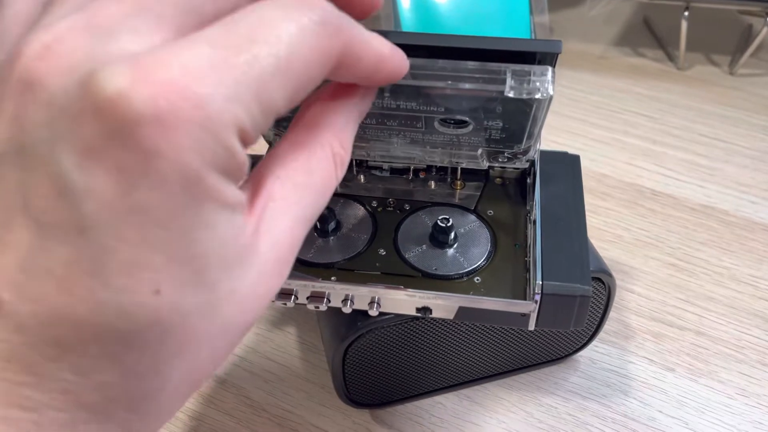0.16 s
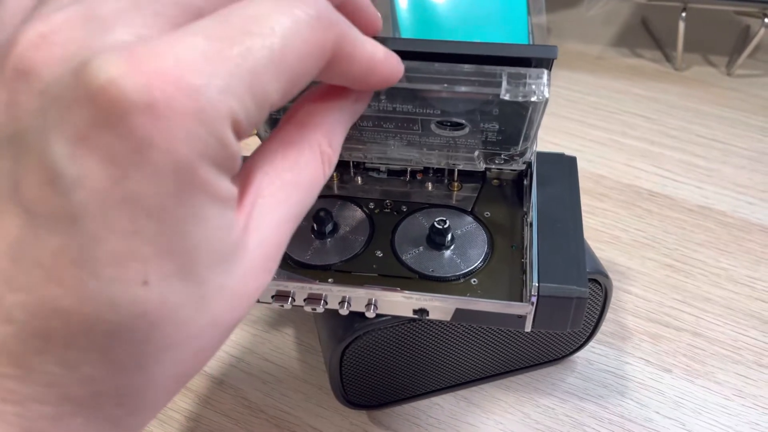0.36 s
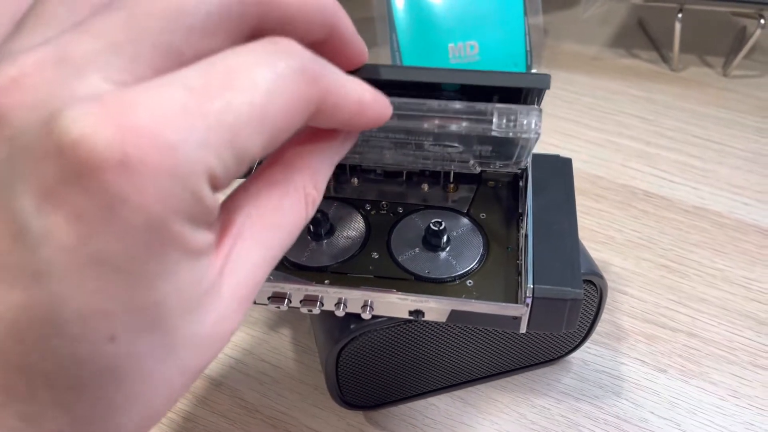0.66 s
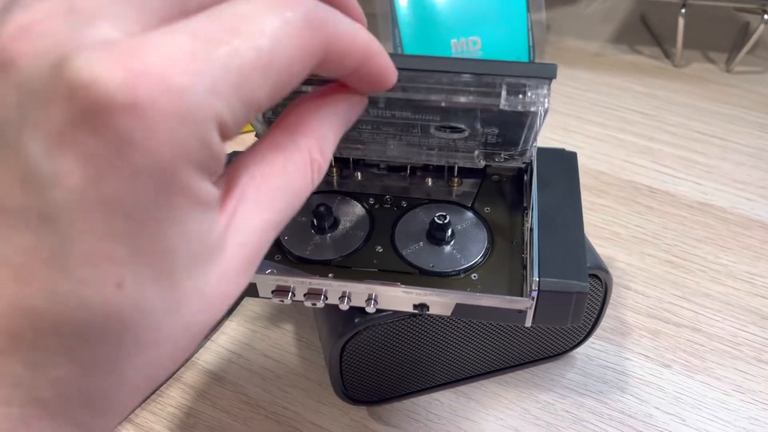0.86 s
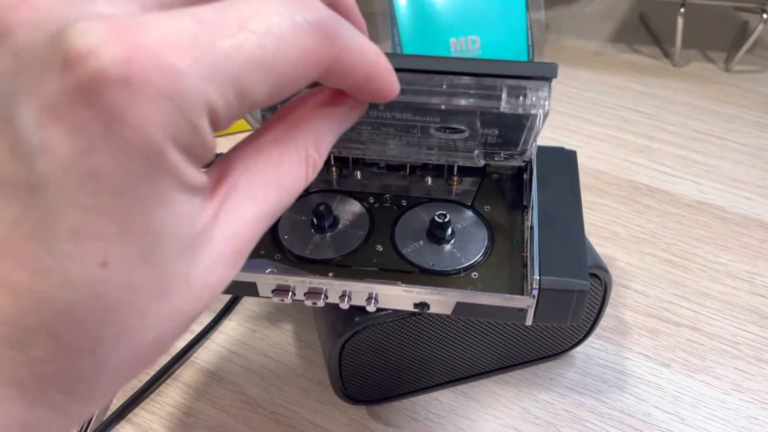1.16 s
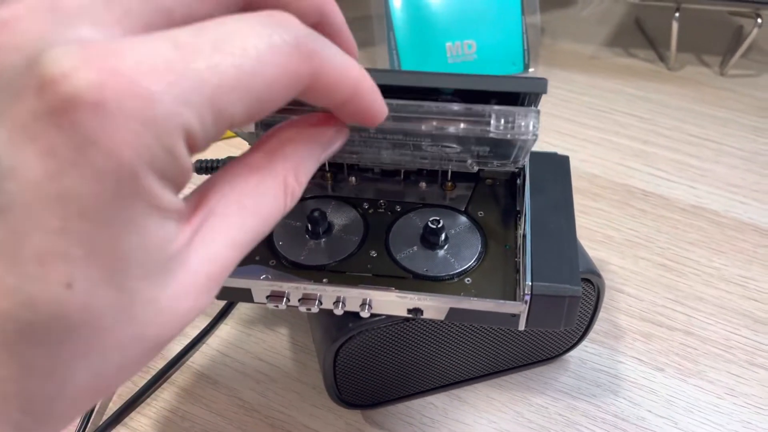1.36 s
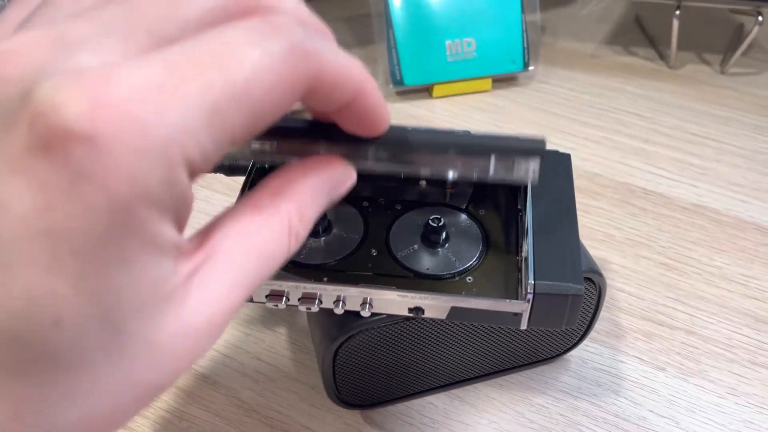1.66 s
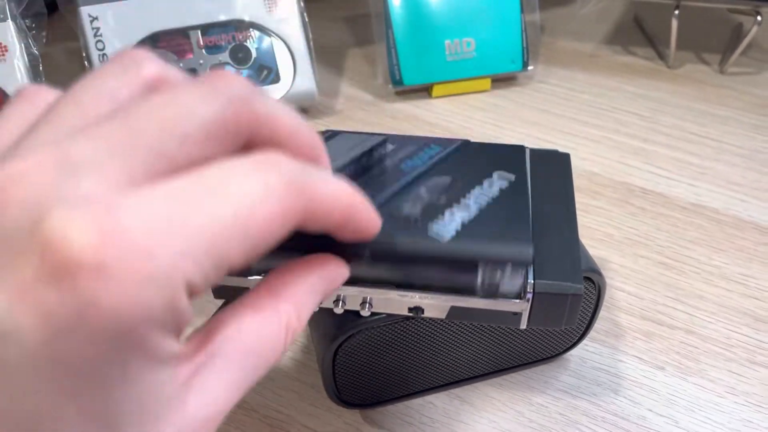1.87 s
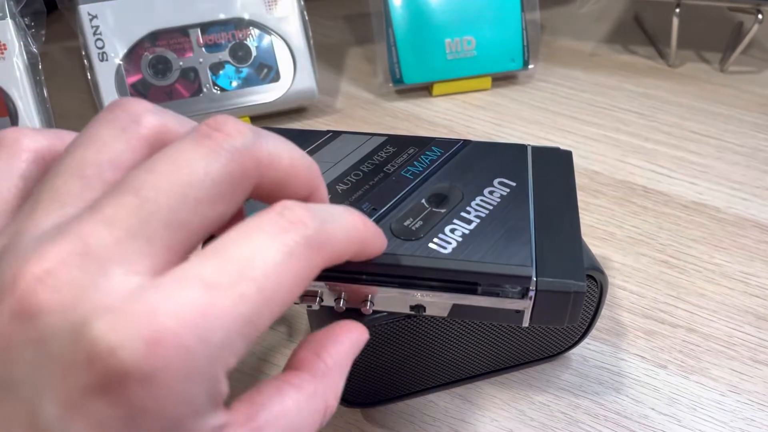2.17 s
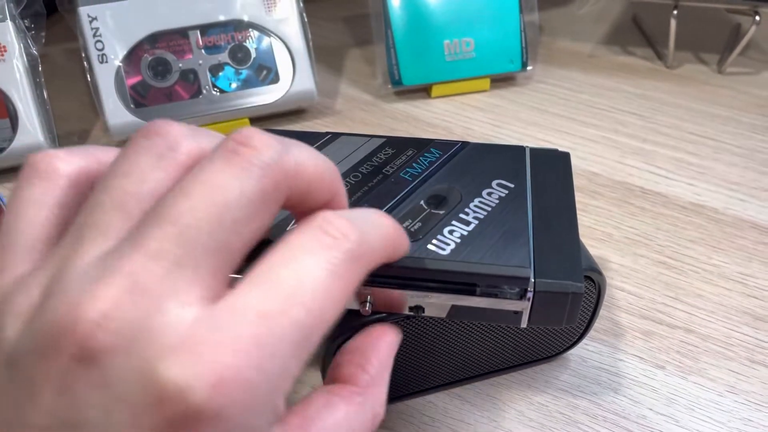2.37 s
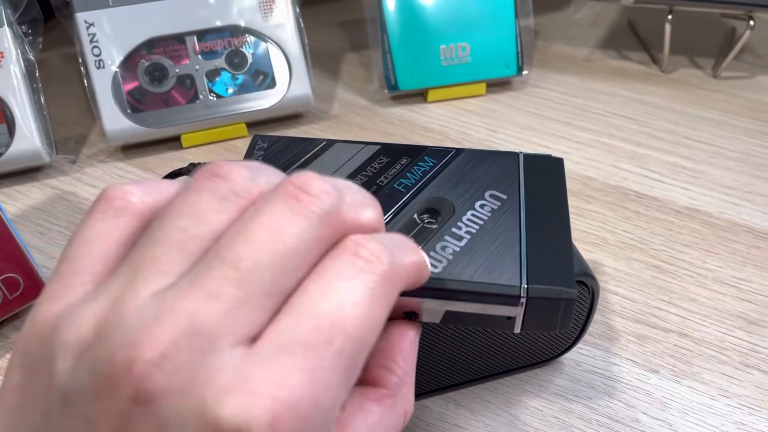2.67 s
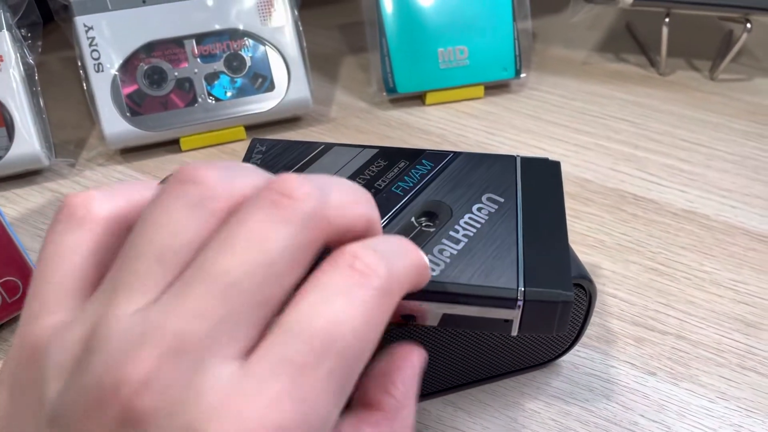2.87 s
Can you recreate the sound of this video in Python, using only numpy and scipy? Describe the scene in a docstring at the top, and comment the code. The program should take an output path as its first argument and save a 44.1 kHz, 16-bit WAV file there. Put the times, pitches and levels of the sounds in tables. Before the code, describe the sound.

A cassette is nudged into a portable player with faint plastic clicks and short scrapes, then the lid rubs down, rattles, and latches with a loud snap and thump, close to the microphone in a small room.

```python
"""Cassette into a portable player

A cassette is nudged into the open lid of a player on a desk, close to the microphone, in a small room.
Filtered noise bursts tick and stick-slip grains scrape as the shell enters its holder; the lid swings
down with a dry rub of grains and the cassette rattles onto the spindles. A last push latches the lid:
a snap, ringing catch modes and a thump of the player on its stand. Low rumble and hum lie beneath.
"""
import sys
import numpy as np
from scipy import signal
from scipy.fft import rfft, irfft
from scipy.io import wavfile
from scipy.ndimage import uniform_filter1d

SR = 44100
rng = np.random.default_rng(int(sys.argv[2]) if len(sys.argv) > 2 else 0)


def store_pcm(level_fs):
    """Save levels as 16-bit WAV."""
    pcm = np.round(np.clip(level_fs, -1, 1) * 32767).astype(np.int16)
    wavfile.write(sys.argv[1], SR, np.atleast_2d(pcm).T)


N = 132300

# background spectrum, relative: (frequency [Hz], density [dB per Hz])
AIR_SPECTRUM = [(20, -35.5), (35, -22), (55, 4), (80, -1.5), (125, -1.5), (175, -11.5), (270, -11),
                (400, -19.5), (540, -13.5), (900, -33), (1250, -36), (2200, -42.5), (5100, -49),
                (8000, -59.5), (11000, -53.5), (16000, -75.5)]
# background left-right likeness: (frequency [Hz], likeness [-1 to 1])
AIR_LIKENESS = [(60, 0.94), (180, 0.83), (550, 0.45), (1650, 0.11), (4970, 0.16), (15000, 0.26)]
# hum partials: (frequency [Hz], level [dB])
HUM_PARTIALS = [(58, -53.5), (118, -65.5)]
# plastic contacts: (time [s], level [dB], rise [s], chatter decay [s], low-mid [dB], treble [dB],
# ring of the touched part [Hz], ring [dB])
CONTACTS = [ (0.0196, -52, 0.006, 0.012, -29, 9, 4170, 13.5),
            (0.0306, -47.5, 0.0029, 0.0065, -34, 7, 6020, 15.5),
            (0.2002, -56.5, 0.00029, 0.0031, 4, -11, 2100, 0),
            (0.206, -55.5, .001, 0.0051, 4.5, -16, 2060, 8),
            (0.326, -50, 0.00029, 0.0046, 8.5, -7.5, 1870, 4),
            (.3790, -38, 0.0021, 0.007, 5, -2, 1970, 9.5), (0.3904, -37, 0.0003, 0.002, 3.5, -2, 5930, 11),
            (.3940, -32.5, 0.0013, 0.0036, 4.5, -1, 1540, 12.5),
            (.3978, -42.5, 0.00046, .003, 9, -2, 1510, 3), (.7790, -50, 0.00037, 0.0034, 5, -6, 6200, 5),
            (.7953, -43, 0.00034, 0.0045, 1.5, -2, 1650, 10.5),
            (.8000, -50.5, 0.0015, 0.005, 9, -2, 1630, 12), (0.818, -40, 0.001, 0.0032, 2, -4, 2400, 1),
            (.8257, -40.5, 0.00041, 0.0021, 3.5, -1.5, 6350, 8),
            (.8322, -42.5, 0.00048, 0.0011, 0, -9, 5100, 13.5),
            (1.3007, -38, 0.0016, 0.0021, -0.5, -3.5, 2330, -6),
            (1.456, -25.5, 0.00076, .0025, 1, 5, 1220, 11.5),
            (1.4620, -40.5, 0.00067, 0.0036, 6, -5, 1120, 16),
            (1.4670, -32.5, 0.00095, 0.0021, 5.5, -14, 1390, 23),
            (1.6454, -45.5, .0004, 0.0024, -21, 3, 9800, 0),
            (1.7086, -39.5, 0.00028, 0.0013, -1.5, -3, 9600, 17.5),
            (1.8175, -36.5, 0.00093, 0.004, 10.5, -6.5, 1020, -1),
            (1.8482, -33.5, .001, 0.0047, 3.5, -4, 1800, -2.5),
            (1.8537, -32, 0.0005, 0.0028, 11.5, 1.5, 5000, 6.5),
            (1.8592, -35, 0.00087, 0.0046, 9.5, -2.5, 2730, 10.5),
            (1.8805, -32, 0.0011, 0.0041, 9.5, -9.5, 784, 9.5),
            (1.8834, -23, 0.00039, 0.0012, 6.5, 4, 9520, 22),
            (1.8948, -29.5, 0.00067, 0.002, 7, 5.5, 2830, 20.5),
            (1.9233, -47.5, 0.00026, 0.0026, -7, 0, 2830, 9),
            (1.9276, -47.5, 0.00042, .003, 0.5, -2, 9900, 1),
            (2.4027, -55.5, 0.00022, 0.0012, -19, -5, 4300, 6),
            (2.5106, -54, 0.0025, 0.0083, -15.5, -8.5, 1970, 8.5),
            (2.5200, -50, 0.002, 0.013, 12, -5.5, 1730, 2.5),
            (2.5465, -56.5, 0.0004, 0.0018, 1.5, -1, 4500, 4.5),
            (2.6103, -43, 0.0022, 0.0087, 11.5, -9, 2600, 4),
            (2.6220, -47, 0.00069, 0.0026, 2, -13, 4080, 10),
            (2.6543, -28.5, 0.00088, 0.0022, 7, -3, 2000, 4.5),
            (2.6586, -26.5, 0.00058, 0.0031, 11, -1, 2050, 12.5),
            (2.664, -16.5, 0.00086, 0.0019, 5.5, 8, 4870, -3),
            (2.6650, -24, 0.0004, 0.0012, -8.5, 11.5, 15300, 18.5)]
# shell sliding under the fingers: (start [s], length [s], level at start [dB], level at end [dB],
# low-mid [dB], treble [dB], ring [Hz], ring [dB])
SCRAPES = [ (0.024, 0.07, -86, -68.5, -10, 4.5, 5800, 9), (0.514, 0.018, -66, -54.5, 7.5, -5, 2000, 9),
           (0.531, 0.093, -65, -59, 6, -4.5, 2090, 7.5), (0.621, 0.042, -59, -76, 7.5, -4, 1880, 9),
           (1.306, 0.04, -61, -60.5, 0.5, -6.5, 4200, 1.5), (1.421, 0.033, -61.5, -37.5, 1, -3.5, 2740, 2),
           (1.859, 0.029, -44.5, -39, 8.5, 1.5, 825, 3.5), (2.349, 0.064, -74.5, -74.5, -14, 12, 5300, 9),
           (2.402, 0.12, -80, -83.5, -12, -2.5, 4900, 9), (2.632, 0.022, -58.5, -43.5, 7.5, -11, 2020, 2)]
# broad colour of the plastic: (frequency [Hz], gain [dB])
PLASTIC_COLOUR = [(60, 7.5), (250, 8), (460, -5), (750, 1.5), (1000, -6), (1800, 1), (2700, 1),
                  (3400, -2.5), (5000, -4.5), (7500, -6), (10000, -8), (13300, -17.5), (15000, -18),
                  (16200, -17.5)]
# resonances of shell and lid, ringing freely: (frequency [Hz], width [Hz], peak [dB])
SHELL_RESONANCES = [(1019, 65, 8), (1198, 90, 5.5), (1562, 130, 3.5), (2080, 130, -2), (2573, 140, 0.5),
                    (2760, 560, 3), (3450, 110, -2), (4370, 180, 4), (5000, 180, 6.5), (5760, 220, 0),
                    (7430, 300, 4.5), (9800, 410, 1.5), (11000, 950, 1), (12800, 300, 7.5)]
# player rocking on its stand: (time [s], relative level [dB], upper modes [dB])
ROCKS = [(0.103, -50, -14), (.222, -44, -4), (.388, -47.5, 7.5), (.414, -39.5, -2), (0.563, -39, 0.5),
         (.622, -38, 3.5), (0.831, -39, 2.5), (1.003, -33, -11.5), (1.457, -30, 7), (1.592, -41.5, 4),
         (1.796, -42.5, 8), (1.819, -41, 11.5), (1.829, -43, 8.5), (1.853, -40, 8), (1.885, -32, 12),
         (1.896, -34, 5), (1.927, -37.5, -6), (2.513, -31.5, 0), (2.664, -10.5, 0)]
# modes of the player body: (frequency [Hz], relative level [dB], t60 [s])
BODY_MODES = [(76.6, -9.5, 0.16), (122.9, 2.5, 0.087), (178.2, -6.5, 0.055), (247.8, -3, 0.062),
              (325.2, -6.5, 0.0496)]
# rub of the closing lid: (time [s], level [dB], speed [0-1])
LID_SWING = [(1.531, -78.5, 0.2), (1.584, -58, 0), (1.625, -60.5, 0.36), (1.67, -54, 0.74),
             (1.725, -49.5, 1), (1.78, -54, 0.35), (1.85, -55, 0)]
# colour of the rub at full speed, relative: (frequency [Hz], gain [dB])
HINGE_COLOUR = [(300, -3), (1400, -3), (2400, 1.5), (3300, -2), (4400, 1), (6200, -10.5), (9700, -6),
                (11700, -16), (16000, -25)]
# modes of the metal catch: (frequency [Hz], level [dB], t60 [s])
CATCH_MODES = [(1248, -38, 0.039), (1497, -41, .035), (1900, -39.5, 0.021), (2090, -31, .03),
               (5000, -30, 0.021), (9700, -26.5, 0.0088), (15000, -22, .004)]
# room decay: (frequency [Hz], t60 [s])
ROOM_DECAY = [(80, 0.97), (250, 0.18), (1000, .26), (4000, 0.23), (9000, 0.31), (15000, 0.17)]
# room level: (frequency [Hz], level [dB])
ROOM_LEVEL = [(80, -17.5), (250, -7.5), (1000, -11), (4000, -15), (9000, -24), (15000, -19.5)]
# room left-right likeness: (frequency [Hz], likeness [-1 to 1])
ROOM_LIKENESS = [(60, 0.73), (300, 0.79), (1000, 0.4), (3000, .3), (15000, .1)]
# phase between the ports: (frequency [Hz], left lead [rad])
PORT_LEAD = [(100, 0), (1200, .2), (2150, .7), (3100, 2.3), (3900, .2), (4520, 1.1), (5600, -.2),
             (6700, -.6), (7700, -2.7), (8900, -3.4), (10800, -6.0), (12700, -6.8), (13900, -9.2),
             (16000, -9.8)]
# level between the ports: (frequency [Hz], left minus right [dB])
PORT_LEVEL = [(60, -2), (110, -3), (200, -5), (380, -1.5), (700, -2), (1290, -3.5), (2380, 1.5), (4400, 3),
              (8120, 2), (15000, -0.5)]

FILTER_TAPS = 4096
AIR_DB, AIR_PATCHY_DB, HUM_WAVER = -56, 1.5, 0.18
LOW_HZ, MID_HZ, TREBLE_HZ = 725, 2300, 9300
RING_WIDTH_PER_HZ, RING_WIDTH_HZ = 0.11, 450
PLACE_DB, PLACE_STEP_HZ = 3.5, 330  # each place of contact favours other resonances
TICK_GAIN, SHARP_S = 3.6, 0.00044  # contacts that build more slowly than SHARP_S lose their tick
CLICK_FREEDOM, RUB_FREEDOM = 0.97, 0.52  # how freely the shell rings; fingers damp it in a scrape
CASE_DB, CASE_S, CASE_LOW_HZ = -18.5, 0.007, 500
ROOM_DELAY_S = 0.0067
GRIP_DB, GRIP_S, SLIP_SPREAD_DB = 1.45, 0.005, 1.5  # uneven grip: depth, step; spread of slip sizes
SLIDE_SLIPS_PER_S, SLIDE_RISE_S, SLIDE_FADE_S = 3500, 0.0086, 0.008
BODY_RISE_S, BODY_DB = 0.0084, 0.5
HINGE_SLIPS_PER_S, SLOW_DB_PER_OCTAVE = 9000, -2
LATCH_S, LATCH_RISE_S = 2.6645, 0.0006  # the catch springs home
LOW_CUT_HZ, EDGE_HZ = 41.5, 16450


def amp(db):
    """Decibels to gain."""
    return 10 ** (np.asarray(db) / 20)


def unit(x):
    """Scales to rms 1."""
    return x / np.sqrt(np.mean(abs(x) ** 2) + 1e-20)


def read(points, hz):
    """Reads a table on a log-frequency axis."""
    f, value = np.transpose(points)
    return np.interp(np.log(hz + 1), np.log(f + 1), value)


def add(mix, s, sound):
    """Mixes a sound in at time s."""
    part = mix[..., round(s * SR):][..., :sound.shape[-1]]
    part += sound[..., :part.shape[-1]]


def pair(a, b, likeness):
    """Two channels of given likeness from two unrelated signals."""
    c = np.clip(likeness, -1, 1)
    return np.array([a, c * a + np.sqrt(1 - c ** 2) * b])


def decay(t, t60):
    """Exponential decay by 60 dB in t60."""
    return np.exp(-np.log(1000) * t / t60)


def coloured(drive, gain):
    """Causal minimum-phase filter, one output row per row of gains."""
    cepstrum = irfft(np.log(gain))
    cepstrum[:, 1:FILTER_TAPS // 2] *= 2
    cepstrum[:, FILTER_TAPS // 2 + 1:] = 0
    response = irfft(np.exp(rfft(cepstrum)))
    return signal.fftconvolve(drive[None], response, axes=1)


def air():
    """Low room rumble, patchy in time and frequency, and a wavering hum."""
    hz, _, z = signal.stft(rng.standard_normal((2, N)), SR, nperseg=2048)
    patches = uniform_filter1d(rng.standard_normal(z.shape[1:]), 8, 0)
    patches = unit(uniform_filter1d(patches, 4, 1))
    gain_db = read(AIR_SPECTRUM, hz)[:, None] + AIR_PATCHY_DB * patches
    z = pair(*z, read(AIR_LIKENESS, hz)[:, None]) * amp(gain_db)
    rumble = signal.istft(z, SR, nperseg=2048)[1][:, :N]
    out = amp(AIR_DB) * unit(rumble)
    t = np.arange(N) / SR
    for f, db in HUM_PARTIALS:
        waver = signal.resample(rng.standard_normal(size=30), N)
        out = out + amp(db) * np.sqrt(2) * (1 + HUM_WAVER * waver) * np.sin(2 * np.pi * f * t)
    return out


def plastic(drive, freedom, low_db, treble_db, ring_hz, ring_db):
    """Force through shell and lid; rows: close up with the damped local ring, and sent to case and room."""
    hz = np.fft.rfftfreq(FILTER_TAPS, 1 / SR)
    db = read(PLASTIC_COLOUR, hz)
    db = db + read([(LOW_HZ, low_db), (MID_HZ, 0), (TREBLE_HZ, treble_db)], hz)
    for f, width_hz, peak_db in SHELL_RESONANCES:
        db = db + freedom * peak_db / (1 + (2 * (hz - f) / width_hz) ** 2)
    knots_hz = np.arange(0, SR / 2, PLACE_STEP_HZ)
    place_db = PLACE_DB * np.interp(hz, knots_hz, rng.uniform(-1, 1, len(knots_hz)))
    offset = 2 * (hz - ring_hz) / (RING_WIDTH_PER_HZ * ring_hz + RING_WIDTH_HZ)
    ring = 1 + (amp(ring_db) - 1) / (1 + offset ** 2) ** 2
    close = amp(db + place_db) * ring
    return coloured(drive, np.array([close, amp(db)]) / np.sqrt(np.mean(close ** 2)))


def clicks():
    """Each contact drives the plastic with a tick and a few milliseconds of chatter."""
    out, t = np.zeros((2, N)), np.arange(FILTER_TAPS) / SR
    for s, db, rise_s, decay_s, *colour in CONTACTS:
        shape = (1 - np.exp(-t / rise_s)) * np.exp(-t / decay_s)
        phase = np.angle(rfft(rng.standard_normal(FILTER_TAPS) * shape))
        # flat spectrum, phases kept
        chatter = irfft(np.exp(1j * phase)) * (t < t[-1] / 2)
        chatter = unit(chatter) * np.sqrt(np.mean(shape ** 2))
        chatter[0] += TICK_GAIN * np.exp(-rise_s / SHARP_S)
        add(out, s, amp(db) * plastic(chatter, CLICK_FREEDOM, *colour))
    return out


def case(x):
    """Sound scatters through the case as a diffuse after-ring of some milliseconds."""
    t = np.arange(FILTER_TAPS) / SR
    noise = rng.standard_normal(FILTER_TAPS) * t * np.exp(-t / CASE_S)
    tail = signal.lfilter(*signal.butter(2, CASE_LOW_HZ, "high", fs=SR), noise)
    return amp(CASE_DB) * signal.fftconvolve(x, tail / np.linalg.norm(tail))[:N]


def room(x):
    """A short diffuse tail, each band dying at its own speed."""
    hz, t, z = signal.stft(rng.standard_normal((2, SR // 2)), SR, nperseg=256)
    t60 = read(ROOM_DECAY, hz)[:, None]
    z = pair(*z, read(ROOM_LIKENESS, hz)[:, None]) * amp(read(ROOM_LEVEL, hz))[:, None]
    energy_norm = np.sqrt(2 * np.log(1000) / (t60 * SR))
    tail = signal.istft(z * decay(t, t60) * energy_norm, SR, nperseg=256)[1]
    tail = np.pad(tail, ((0, 0), (round(ROOM_DELAY_S * SR), 0)))
    return signal.fftconvolve(x[None], tail, axes=1)[:, :N]


def slips(per_s):
    """Stick-slip friction: dense tiny impulses of uneven size under an uneven grip."""
    knots_s = np.arange(N // 40) * GRIP_S
    grip_db = GRIP_DB * np.interp(np.arange(N) / SR, knots_s, rng.standard_normal(len(knots_s)))
    size = amp(grip_db + SLIP_SPREAD_DB * np.minimum(rng.exponential(1, N), 4))
    struck = rng.random(N) < per_s / SR
    return unit(size * rng.choice([-1, 1], N) * struck)


def slides():
    """Short scrapes of the shell in its holder: slip grains pressed through the plastic."""
    out, grains = np.zeros((2, N)), slips(SLIDE_SLIPS_PER_S)
    for s, length_s, first_db, last_db, *colour in SCRAPES:
        t = np.arange(0, length_s + 10 * SLIDE_FADE_S, 1 / SR)
        fade = np.exp(-np.maximum(t - length_s, 0) / SLIDE_FADE_S)
        edges = (1 - np.exp(-t / SLIDE_RISE_S)) * fade
        pressure = edges * amp(np.interp(t, [0, length_s], [first_db, last_db]))
        force = pressure * grains[round(s * SR):][:len(t)]
        add(out, s, plastic(force, RUB_FREEDOM, *colour))
    return out


def thumps():
    """Pushes rock the player on its stand as decaying modes; the upper modes vary with each push."""
    out, t = np.zeros(N), np.arange(SR // 3) / SR
    swell = 1 - np.exp(-(t / BODY_RISE_S) ** 2)
    for s, db, upper_db in ROCKS:
        modes = 0
        for hz, level_db, t60 in BODY_MODES:
            gain = amp(level_db + read([(125, 0.024), (240, upper_db)], hz))
            modes = modes + gain * decay(t, t60) * np.sin(2 * np.pi * hz * t)
        add(out, s, amp(db + BODY_DB) * swell * modes)
    return out


def swing():
    """The lid rubs on its hinge coming down: a rush of slips, brighter with speed."""
    t, (s, db, speed) = np.arange(N) / SR, np.transpose(LID_SWING)
    fast = np.clip(np.interp(t, s, speed), 0, 1)
    level = amp(np.interp(t, s, db)) * (t > s[0]) * (t < s[-1])
    hz, out = np.fft.rfftfreq(FILTER_TAPS, 1 / SR), np.zeros((1, N))
    # crossfade of a dull slow rub and a bright fast one
    for share, tilt in [(1 - fast, SLOW_DB_PER_OCTAVE), (fast, 0)]:
        gain = unit(amp(read(HINGE_COLOUR, hz) + tilt * np.log2(hz + LOW_HZ)))
        rub = level * np.sqrt(share) * slips(HINGE_SLIPS_PER_S)
        out += coloured(rub, gain[None])[:, :N]
    return out


def latch():
    """The metal catch rings briefly as the lid locks: decaying modes at random phase."""
    out, t, ring = np.zeros(N), np.arange(FILTER_TAPS) / SR, 0
    for hz, db, t60 in CATCH_MODES:
        ring = ring + amp(db) * decay(t, t60) * np.sin(2 * np.pi * (hz * t + rng.random()))
    add(out, LATCH_S, (1 - np.exp(-t / LATCH_RISE_S)) * ring)
    return out


def ports(x):
    """The near sound reaches the two microphone ports slightly out of step."""
    turn = np.exp(0.5j * read(PORT_LEAD, np.fft.rfftfreq(N, 1 / SR)))
    return irfft(rfft(x) * np.array([turn, turn.conj()]), N)


def scene():
    """The handled player, its room and the background."""
    close, radiated = clicks() + slides() + swing() + thumps() + latch()
    return ports(close + case(radiated)) + room(radiated) + air()


def record(dry):
    """Each port has its own colour; then the low cut and the band limit."""
    hz = np.fft.rfftfreq(N, 1 / SR)
    lean_db = read(PORT_LEVEL, hz) / 2
    low_cut = hz ** 2 / np.hypot(hz ** 2, LOW_CUT_HZ ** 2)
    heard = irfft(rfft(dry) * low_cut * amp([lean_db, -lean_db]), N)
    band_limit = signal.firwin(511, EDGE_HZ, window=("kaiser", 9), fs=SR)
    return signal.oaconvolve(heard, band_limit[None], "same")


dry = scene()
out = record(dry)
store_pcm(out)
```